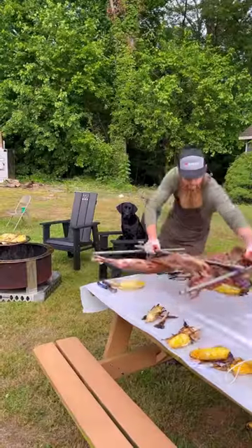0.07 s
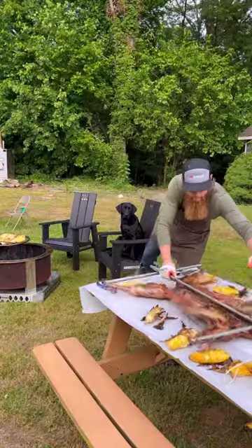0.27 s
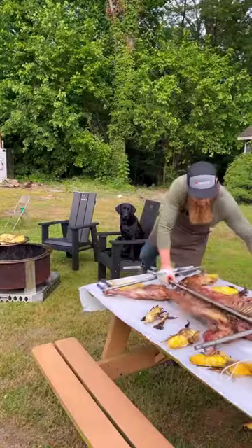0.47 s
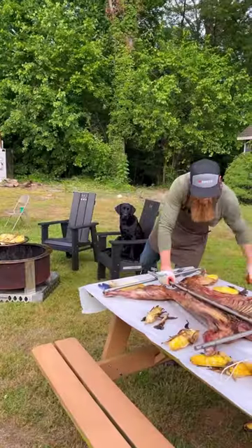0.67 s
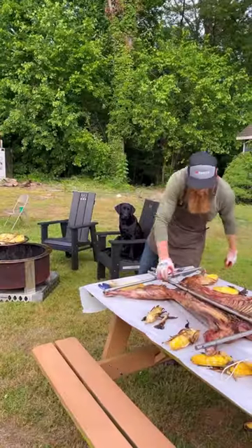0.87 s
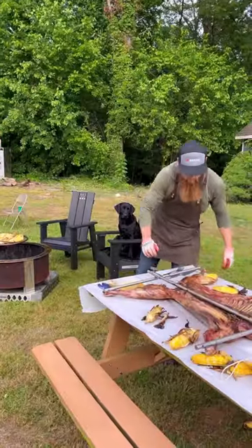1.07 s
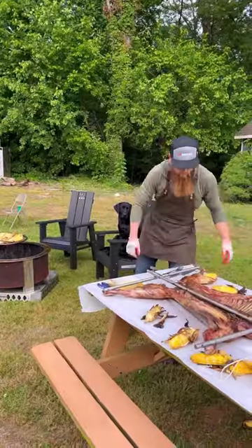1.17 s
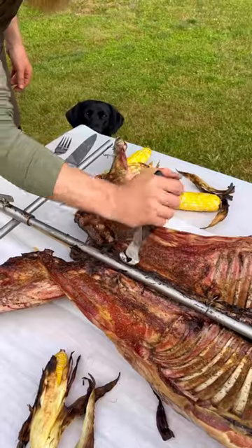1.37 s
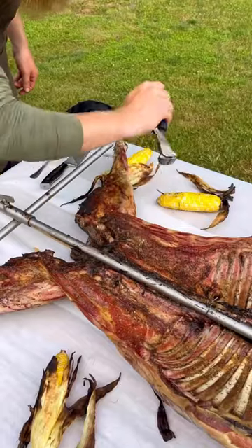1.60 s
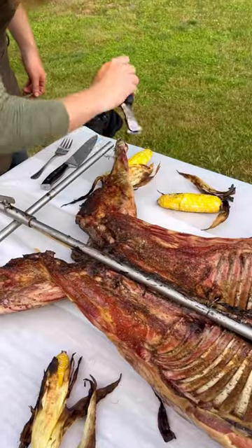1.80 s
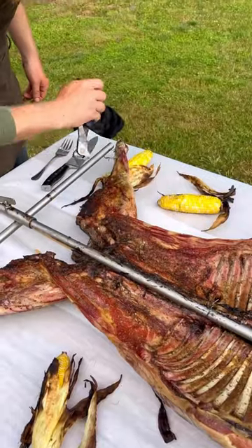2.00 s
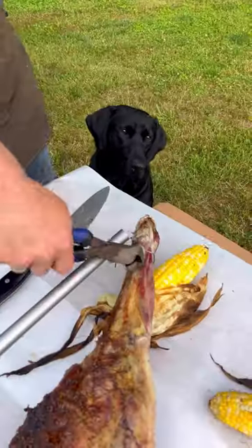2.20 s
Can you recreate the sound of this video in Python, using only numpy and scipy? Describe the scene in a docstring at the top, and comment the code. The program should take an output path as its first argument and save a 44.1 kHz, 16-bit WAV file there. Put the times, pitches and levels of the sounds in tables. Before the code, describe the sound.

A heavy steel spit frame with a roast lands on a wooden table at about 0.25 seconds: a loud thud, ringing metal clatter and crunching crust. It settles with two lighter knocks around 0.6 seconds and a few tiny crackles. At 1.4 seconds a knife strikes the meat once, close and sharp. The quiet backyard carries a distant engine drone and faint bird chirps, clearest near 1.8 seconds.

```python
"""Spit roast on a picnic table.

A steel spit frame with a roast lands on a covered wooden table: the bars clatter and ring, the top
thuds, crust and cover crunch, and the frame settles with two knocks. Then, close up, a knife strikes
the roast once. Behind it is a quiet backyard with a distant engine drone and a bird."""
import sys
import numpy as np
from scipy import signal
from scipy.fft import rfft, irfft
from scipy.io import wavfile
from scipy.ndimage import uniform_filter1d

SR = 44100
rng = np.random.default_rng(int(sys.argv[2]) if len(sys.argv) > 2 else 0)


def store_wav(level_fs):
    """Save 16-bit WAV to argv[1]."""
    pcm = np.round(np.clip(np.atleast_2d(level_fs), -1, 1) * 32767)
    wavfile.write(sys.argv[1], SR, pcm.T.astype(np.int16))


N = 99225
T = np.arange(N) / SR
FREQ_HZ = np.maximum(np.arange(N // 2 + 1) * SR / N, 1)

# air, far and close; low rumble; yard echo: freq_hz, level_db
AIR_FAR_EQ = [(76, -52), (130, -6.5), (704, -5), (858, 0.5), (2700, -15.5), (6010, -34.5), (11800, -33.5),
              (15000, -41)]
AIR_CLOSE_EQ = [(76, -18), (130, -2.5), (403, -11), (566, -5.5), (1110, -10), (15000, -47.5)]
RUMBLE_EQ = [(20, -24), (40, 13.5), (85, 16), (120, 13), (200, -42)]
ECHO_EQ = [(100, 3.5), (500, 3), (1500, -1.5), (14000, -11.5)]
# engine drone: time_s, level_db
DRONE_ENVELOPE = [(0, -53.5), (.3, -44), (1.1, -41.5), (1.3, -45), (1.6, -49), (2.25, -55)]
# bird notes: start_s, length_s, from_hz, to_hz, level_db
BIRD_NOTES = [(.82, 0.15, 3600, 2836, -59), (1.235, 0.046, 2900, 2520, -52), (1.76, 0.043, 3840, 3150, -49),
              (1.802, 0.0396, 2096, 2330, -49.5), (1.837, .028, 2355, 2895, -45),
              (1.855, 0.13, 2278, 2082, -52.5)]

# weight landing on the table: start_s, level_db, push_ms
TABLE_PUSHES = [(0.2383, -9, 3), (0.2635, -11, 1.8), (0.2677, -11, 2.1), (0.2728, -8, 2.32),
                (0.2837, -9, 2.14)]
# crust cracking: start_s, level_db
CRUST_CRACKLES = [(0.126, -41.5), (.152, -47.5), (.391, -28.5), (0.5564, -37), (0.585, -41), (0.664, -45),
                  (.948, -50), (0.9916, -41), (1.027, -50), (1.066, -44.5), (1.466, -39.5), (1.666, -48),
                  (2.072, -47.5), (2.1728, -39.5)]
# bars hitting the table: start_s, level_db, pitch_hz, note_db, cutoff_hz
BAR_HITS = [(.2186, -27, 1400, -3, 2900), (0.2326, -24, 585, -1, 2000), (0.2553, -17.5, 1270, -2.5, 12000),
            (0.2792, -26, 1600, 3, 3500), (.3035, -29, 643, 3.5, 4400), (.321, -35, 1434, 4.5, 3500),
            (.338, -35.5, 590, 8, 1500), (0.3467, -29.5, 1657, -5, 6000), (.386, -31.5, 520, -1.5, 3000),
            (.5555, -25.5, 2115, -4.5, 7900), (.5625, -33, 579, 3, 2200), (.586, -40, 702, 9.5, 1500),
            (0.6387, -31, 1526, 7, 2740)]
# knife edge and bite: start_s, level_db
BLADE_HITS = [(1.3859, -15.5), (1.387, -15)]
# table top, steel frame, blade damped by meat, roast on the boards: freq_hz, level_db, t60_s
TOP_MODES = [(101.5, -14, 0.59), (129.3, 2, 0.03), (177.6, -28, 0.73), (228, -7.5, 0.077),
             (329, -9.5, 0.027)]
STEEL_MODES = [(558, -5, 0.33), (873.3, -10, .65), (1110, -7, 0.21), (1272, -6, 0.14), (1470, -6, .25),
               (1555, -3, 0.23), (2360, -20.5, 0.21)]
KNIFE_MODES = [(1687, -9.5, 0.019), (3820, -10.5, 0.027), (6480, -3.5, 0.015), (7510, 3, .008),
               (9180, -3, 0.0097), (11000, 1, 0.01), (13100, -3, .007)]
ROAST_MODES = [(234, -1.5, 0.059), (312, 5.5, 0.03), (516, 3.5, 0.032), (635, -5.5, 0.098)]
# noise of boards, crushed crust, single crackle, bar contact: freq_hz, level_db
BOARDS_EQ = [(45, -34), (120, 1.5), (250, -3.5), (330, -13), (1500, -72)]
CRUNCH_EQ = [(200, -11.5), (800, 5), (6000, -1), (10000, -5.5), (14500, -8.5), (15500, -66)]
CRACKLE_EQ = [(1000, -16), (7000, -6.5), (13500, -14), (16000, -37.5)]
CLANK_EQ = [(100, -24.5), (750, -0.5), (1000, -3), (2800, -5.5), (5000, -12), (8000, 0), (14000, -27)]

# side over mid; left over right: freq_hz, level_db
SIDE_EQ = [(100, -28.5), (700, -0.5), (1600, -4.5), (3500, 0.5), (6500, -19)]
BALANCE_EQ = [(220, 0), (500, -4.5), (5700, -0.5)]
# left microphone port's lead: freq_hz, phase_rad
LEFT_LEAD = [(0, 0), (900, -0.4), (2700, 1.52), (4700, 0.52), (6000, 3.5), (16000, 17.5)]

def undb(db):
    """Decibels to gain."""
    return 10 ** (np.asarray(db) / 20)

def curve(points):
    """Gain per FFT bin from (freq_hz, level_db) points."""
    hz, db = np.array(points, float).T
    return undb(np.interp(np.log(FREQ_HZ), np.log(hz), db))

def unit(x):
    """Scale to rms 1."""
    return x / np.sqrt(np.mean(x ** 2))

def noise(gain, grit=1):
    """Coloured stereo noise, near mono in the bass; grit makes it grainy."""
    mid, side = rfft(rng.standard_normal((2, N)) * grit)
    width = curve(SIDE_EQ)
    stereo = np.array([mid + width * side, mid - width * side])
    return unit(irfft(stereo * gain / np.hypot(1, width), N))

def at(x, start_s):
    """Delay a sound to start_s."""
    k = int(np.clip(round(start_s * SR), 0, N - 1))
    return np.concatenate([np.zeros(x.shape[:-1] + (k,)), x[..., :N - k]], axis=-1)

def fade(t60_s):
    """Exponential decay."""
    return np.exp(-np.minimum(np.log(1000) * T / t60_s, 50))

def ring(modes, shape=np.sin):
    """Decaying modes after one blow."""
    return sum(undb(db) * fade(t60_s) * shape(2 * np.pi * hz * T) for hz, db, t60_s in modes)

def wander(rate_hz):
    """Smooth random drift, rms 1."""
    k = int(SR / rate_hz)
    steps = np.repeat(rng.standard_normal(N // k + 1), k)
    return unit(uniform_filter1d(uniform_filter1d(steps, k), k)[:N])

def backyard(close_s=1.235, far_db=-50, close_db=-48.5, rumble_db=-49):
    """Outdoor air, rumble and engine; the air changes colour at close_s."""
    close = np.clip((T - close_s) / 0.011, 0, 1)
    low_cut = 1 / np.hypot(1, (110 / FREQ_HZ) ** 3)
    air = (1 - close) * undb(far_db) * noise(curve(AIR_FAR_EQ) * low_cut)
    air += close * undb(close_db) * noise(curve(AIR_CLOSE_EQ) * low_cut)
    rumble = undb(rumble_db) * noise(curve(RUMBLE_EQ))
    return rumble + engine(close) + air * undb(0.51 * wander(9.44))

def engine(whine_gate, drone_hz=66.47, whine_hz=577, whine_db=-61):
    """A distant engine's drone and faint whine waver together in pitch."""
    rad_per_hz = 2 * np.pi * np.cumsum(1 + 0.023 * wander(8.01)) / SR
    drone_db = np.interp(T, *np.array(DRONE_ENVELOPE).T) + 2 * wander(11.84)
    drone = unit(np.sin(drone_hz * rad_per_hz)) * undb(drone_db)
    whine = unit(np.sin(whine_hz * rad_per_hz)) * undb(whine_db + 2 * wander(10.25))
    return drone + whine_gate * whine

def bird():
    """Whistles glide and level off, fluttering on their way through the trees."""
    out = 0
    for start_s, length_s, from_hz, to_hz, db in BIRD_NOTES:
        progress = np.minimum(T / length_s, 1)
        glide_hz = to_hz + (from_hz - to_hz) * (1 - progress) ** 2
        pitch_hz = glide_hz * (1 + .014 * wander(400))
        whistle = np.sin(np.pi * progress) * np.sin(2 * np.pi * np.cumsum(pitch_hz) / SR)
        flutter = undb(3 * wander(150))
        out += undb(db) * at(flutter * whistle, start_s)
    return out

def echoes(x, db, t60_s=0.44):
    """Scatter from house and trees."""
    tail = at(noise(curve(ECHO_EQ)) * fade(t60_s), start_s=0.013)
    tail /= np.sqrt(np.sum(tail ** 2) / 2)
    return undb(db) * signal.fftconvolve(x * np.ones((2, 1)), tail, axes=1)[:, :N]

def table(boards_db=-22.5):
    """Soft heavy pushes ring the top and leave the boards rumbling."""
    top, out = ring(TOP_MODES, np.cos), 0
    for start_s, db, push_ms in TABLE_PUSHES:
        push = np.sin(np.pi * np.minimum(T[:SR // 50] * 1000 / push_ms, 1))
        thud = signal.fftconvolve(top, push / push.sum())[:N]
        boards = undb(boards_db) * noise(curve(BOARDS_EQ)) * fade(t60_s=1.13)
        out += undb(db) * at(thud + boards, start_s)
    return out

def swell(peak_s, rise_s, fall_s):
    """Exponential rise and fall."""
    return np.exp(-np.maximum((peak_s - T) / rise_s, (T - peak_s) / fall_s))

def crunch(peak_s=0.252, grains_per_s=1500):
    """Crust and cover crush in dense grains that fade as the load settles; the crust also crackles."""
    onsets = rng.random(N) < grains_per_s / SR
    grain_db = 1.5 * np.minimum(rng.exponential(size=N), 2)
    landing = undb(-23.5) * swell(peak_s, rise_s=0.0067, fall_s=0.01)
    settling = undb(-29) * swell(peak_s, rise_s=0.026, fall_s=0.11)
    out = (landing + settling) * noise(curve(CRUNCH_EQ), grit=onsets * undb(grain_db) + 0.31)
    for start_s, db in CRUST_CRACKLES:
        out += undb(db) * at(noise(curve(CRACKLE_EQ)) * fade(t60_s=0.018), start_s)
    return out

def frame(steel_db=-15.5, t60_1khz_s=0.1, note_t60_s=0.052):
    """Each bar contact clanks, treble dying first, sounds a three-note cluster and rings the steel."""
    out, n = 0, SR // 2
    octaves_hz = 125 * 2. ** np.arange(8)
    log_hz = np.log(np.arange(n // 2 + 1) * SR / n + 1)
    bands = np.array([np.interp(log_hz, np.log(octaves_hz), row) for row in np.eye(8)])
    decays = np.array([fade(t60_1khz_s * (hz / 1000) ** -0.98)[:n] for hz in octaves_hz])
    steel = np.array([ring([mode]) for mode in STEEL_MODES])
    for start_s, db, pitch_hz, note_db, cutoff_hz in BAR_HITS:
        burst = noise(curve(CLANK_EQ) / np.hypot(1, (FREQ_HZ / cutoff_hz) ** 2))[:, :n]
        burst_bands = irfft(rfft(burst)[:, None] * bands, n)
        clank = np.pad((burst_bands * decays).sum(axis=1), ((0, 0), (0, N - n)))
        mode_gains = rng.choice([-1, 1], len(steel)) + 0.18 * rng.standard_normal((2, len(steel)))
        notes = [(pitch_hz * (1 + 0.126 * k), note_db - 9 * abs(k), note_t60_s) for k in (-1, 0, 1)]
        ringing = ring(notes) + undb(steel_db) * mode_gains @ steel
        attack = np.minimum(T * cutoff_hz / 2, 1)  # duller contacts build more slowly
        out += undb(db) * at(attack * (clank + ringing), start_s)
    return out

def knife(chop_s=1.3897, drag_rise_s=0.0065):
    """The blade drags, clicks through the crust and scrapes; the roast knocks on the boards."""
    blade, clicks = ring(KNIFE_MODES), 0
    for start_s, db in BLADE_HITS:
        bite = undb(-3.5) * noise(curve(CRACKLE_EQ)) * fade(t60_s=0.0081)
        clicks += undb(db) * at(blade + bite, start_s)
    scrape = undb(-44) * noise(curve(CRUNCH_EQ)) * fade(t60_s=0.32)
    lead_s = BLADE_HITS[0][0] - T
    drag = undb(-37) * noise(curve(CRUNCH_EQ)) * (lead_s > 0) * np.exp(-np.abs(lead_s) / drag_rise_s)
    knock = undb(-28.5) * ring(ROAST_MODES, np.cos)
    return drag + clicks + at(scrape + knock, chop_s)

def scene():
    """Landing and bird with echoes, dry close knife, backyard."""
    landing, song = table() + frame() + crunch(), bird()
    return landing + echoes(landing, db=-22) + knife() + song + echoes(song, db=-6) + backyard()

def record(dry, low_cut_hz=40, high_cut_hz=14700, top_hz=16400):
    """Two microphone ports differ in level and phase; deep bass and top treble are cut."""
    lead_rad = np.interp(FREQ_HZ, *np.array(LEFT_LEAD).T)
    left = np.sqrt(curve(BALANCE_EQ)) * np.exp(.5j * lead_rad)
    band = 1 / np.hypot(1, (low_cut_hz / FREQ_HZ) ** 4) / np.hypot(1, (FREQ_HZ / high_cut_hz) ** 20)
    heard = irfft(rfft(dry) * np.array([left, 1 / left]) * band, N)
    return signal.sosfilt(signal.ellip(8, .2, 70, top_hz, fs=SR, output="sos"), heard)


dry = scene()
out = record(dry)
store_wav(out)
```